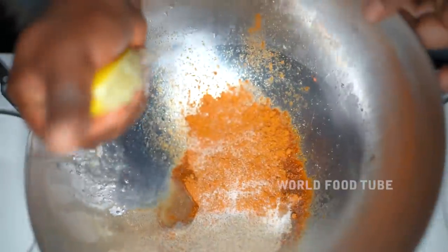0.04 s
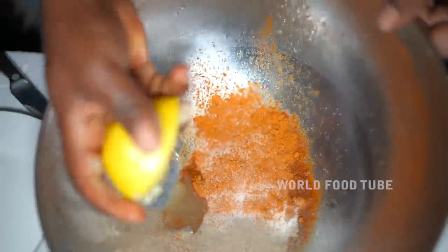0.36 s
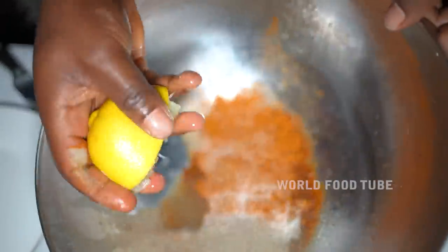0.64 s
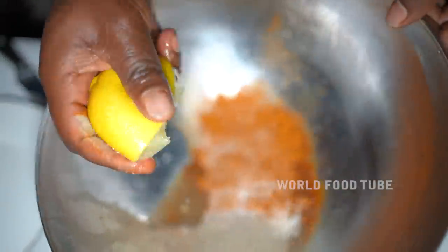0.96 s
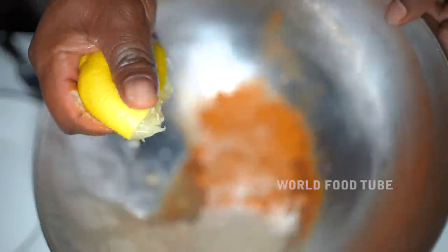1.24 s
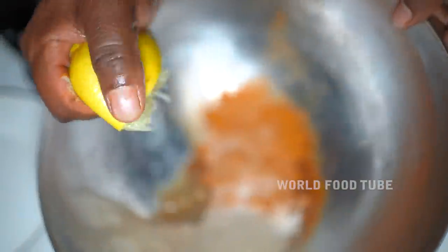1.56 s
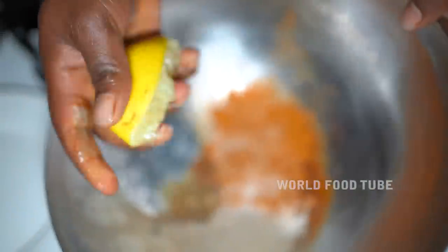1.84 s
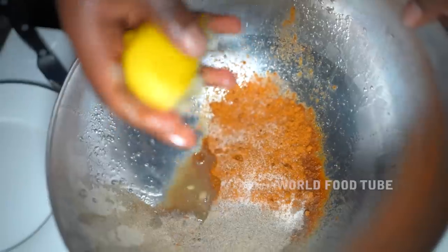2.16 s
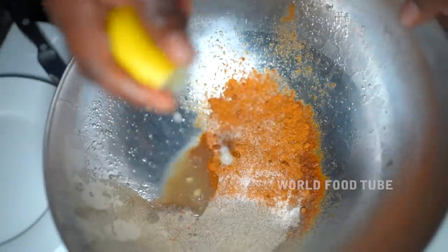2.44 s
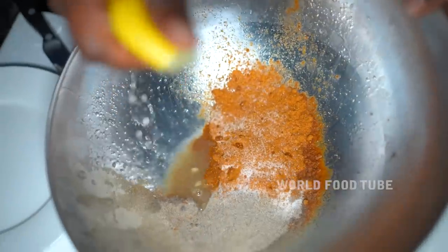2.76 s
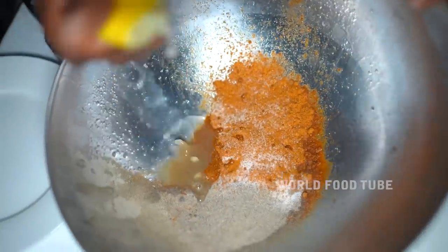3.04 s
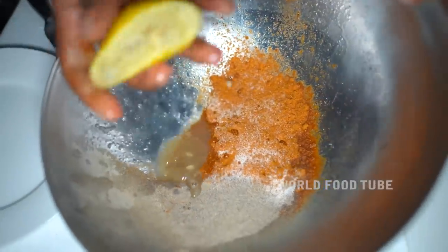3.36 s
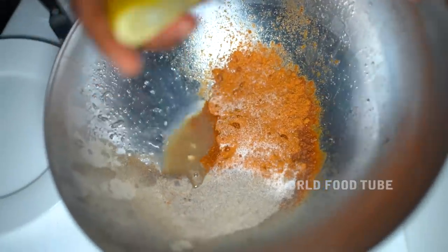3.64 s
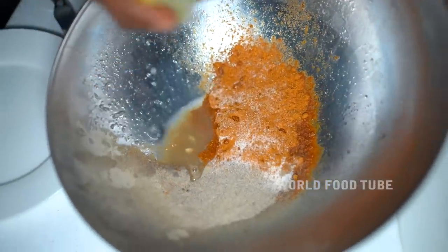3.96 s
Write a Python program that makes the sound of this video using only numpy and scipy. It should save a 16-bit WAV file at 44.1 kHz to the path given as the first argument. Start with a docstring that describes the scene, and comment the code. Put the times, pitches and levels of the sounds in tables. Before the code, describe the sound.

Half a lemon is squeezed by hand over a steel bowl, squelching and fizzing in spurts. Tiny pops and drips follow, and a few quick squelches finish the squeeze. Moving air rumbles on the close microphone throughout.

```python
"""Half a lemon is squeezed by hand over a steel bowl of spices, close to a microphone buffeted by air.
A thin jet hisses, then the pulp squelches as the grip changes and the first drops tap the bowl.
After a second, juice cells snap, small bubbles pop and, near 1.4 s, two drops plop into the puddle.
From 2.3 s the pulp fizzes harder under pressure, with more squelches, snaps and taps.
Three quick squelches close the squeeze near 3.8 s while the rumble of the air swells."""
import sys
import numpy as np
from scipy import signal
from scipy.fft import rfft, irfft, next_fast_len
from scipy.io import wavfile
from scipy.ndimage import uniform_filter1d, map_coordinates

SR = 44100
rng = np.random.default_rng(int(sys.argv[2]) if len(sys.argv) > 2 else 0)


def bounce(signal):
    """Save signal as a 16-bit WAV file at the path given by the first command-line argument."""
    frames = np.transpose(np.atleast_2d(signal))
    limited = np.clip(frames, -1, 1)
    pcm = np.round(limited * 32767).astype(np.int16)
    wavfile.write(sys.argv[1], SR, pcm)


N = 176400

# The bright tone of fine juice spray. Each row: frequency in Hz, relative gain in dB.
SPRAY = [(3000, -11), (6000, 0.5), (9000, 0.5), (16000, -4.5)]


def squelches():
    """Each fold of the wet pulp lets go a short, dense clump of bursting bubbles."""
    # Folds of the pulp. Each row: start in seconds, length in seconds, body level in dB, spray in dB.
    folds = [(0.365, 0.02, -40, -47.5), (0.387, 0.0092, -46, -64), (0.866, 0.023, -44.5, -61),
             (0.922, 0.03, -50.5, -54.5), (1.71, 0.016, -46.5, -58), (2.315, 0.021, -49.5, -76),
             (2.346, 0.019, -34.5, -65), (2.604, 0.025, -50, -57), (2.734, 0.016, -60, -48),
             (3.166, 0.021, -42.5, -46.5), (3.746, 0.021, -40.5, -65), (3.771, 0.02, -35, -43.5),
             (3.794, 0.046, -45.5, -73)]
    # The wet tone of a fold. Each row: frequency in Hz, relative gain in dB.
    squish_eq = [(500, -3), (1250, -6), (1800, 8), (2150, 3), (2700, 6), (3800, 12.5), (5000, 4.5),
                 (7000, 2.5), (11000, -30)]
    body, spray = np.zeros((2, N))
    for start, length, body_db, spray_db in folds:
        shape = swell(start, length, attack=0.0023, release=0.015)
        body += amp(body_db) * shape
        spray += amp(spray_db) * shape
    large = coloured(bubbles(count=5000, low_hz=1027, high_hz=7800, cycles=29, spread_db=-1.5), squish_eq)
    small = coloured(bubbles(count=6000, low_hz=8400, high_hz=18400, cycles=4.9, spread_db=5.5), SPRAY)
    return body * steadied(large, size=600) + spray * steadied(small, size=600)


def fizz():
    """Juice seeps through the pulp in fizzy spurts, with sticky crackle on top; thin jets add spray."""
    # The flow of seeping juice. Each row: time in seconds, relative level in dB.
    flow = [(0, -63), (.25, -64.5), (.38, -56), (.52, -66), (.68, -59), (.78, -54), (1.0, -58),
            (1.18, -54.5), (1.4, -59.5), (1.65, -66.5), (1.79, -53.5), (1.93, -70.5), (2.15, -63.5),
            (2.32, -52.5), (2.57, -57.5), (2.67, -51), (2.85, -54), (3.13, -66.5), (3.2, -49.5),
            (3.36, -72), (3.7, -58), (3.84, -55.5), (4, -62)]
    # Thin jets hissing out. Each row: start in seconds, length in seconds, level in dB.
    jets = [(0, 0.073, -63), (1.095, 0.15, -57.5), (2.706, 0.18, -54.5)]
    # The tones of the fizzing pulp and of its crackle. Each row: frequency in Hz, relative gain in dB.
    pulp_eq = [(350, -19.5), (700, -2.5), (950, -8.5), (1450, -7.5), (1780, 3), (2100, -8), (2650, 2.5),
               (3100, 1), (3850, 6), (4900, -6), (6200, -5.5), (13000, -26)]
    crackle_eq = [(900, -2.5), (3300, -4.5), (12000, -3.5)]
    flow_db, = curves(flow)
    body_gain = amp(flow_db - 1 + 4.4 * wobble(45))
    jet_gain = sum(amp(db) * swell(start, length, attack=0.013, release=0.67) for start, length, db in jets)
    spray_gain = np.hypot(jet_gain, amp(flow_db - 11))
    crackle_gain = amp(-61 + 0.62 * (flow_db - flow_db.mean()))  # rides the flow with gentler swings
    body = coloured(bubbles(count=9000, low_hz=590, high_hz=9240, cycles=11.5, spread_db=1), pulp_eq)
    spray = coloured(bubbles(count=12000, low_hz=4380, high_hz=17200, cycles=14, spread_db=3.5), SPRAY)
    crackle = coloured(bubbles(count=750, low_hz=1290, high_hz=15300, cycles=15, spread_db=5), crackle_eq)
    return body_gain * body + spray_gain * spray + crackle_gain * crackle


def wet_accents():
    """Bubbles pop, juice cells snap, air squeaks out in rising chirps and drops land with a dull tap."""
    # Bubbles popping at the cut face. Each row: start in seconds, gain in dB, pitch in Hz,
    # crack relative to the ring in dB.
    pops = [(0.128, -31, 5930, -9), (0.7993, -16, 6060, -41), (1.176, -24.5, 6600, -19),
            (1.313, -21, 5710, -6.5), (1.507, -26, 5860, 3), (1.818, -34.5, 5780, -4),
            (3.0196, -28, 6030, -6), (3.1035, -43.5, 5840, 14.5)]
    # Juice cells snapping. Each row: start in seconds, gain in dB, pitch in Hz.
    snaps = [(.312, -36.5, 3310), (0.3303, -28.5, 3680), (1.055, -37, 2610), (1.1084, -27, 3290),
             (1.153, -29, 2860), (1.1778, -25.5, 3060), (1.2402, -31, 7060), (1.334, -29.5, 4360),
             (1.682, -36, 9100), (1.701, -36, 10260), (2.2329, -37.5, 3000), (2.325, -31, 1740),
             (2.4635, -31, 3800), (2.553, -30, 4160), (2.864, -31.5, 3410), (3.7321, -31.5, 2900),
             (3.8098, -22, 5320)]
    # Air squeaking out of the pulp. Each row: start in seconds, gain in dB.
    chirps = [(.453, -34.5), (1.39, -30.5), (1.443, -37)]
    # Drops hitting the spices and the bowl. Each row: start in seconds, gain in dB.
    taps = [(0.284, -31), (.395, -27.5), (0.438, -32), (2.532, -35), (2.949, -33), (3.082, -33),
            (3.415, -31), (3.641, -29), (3.704, -34)]
    out = np.zeros(N)
    for start, db, hz, crack_db in pops:
        add(out, start, amp(db) * burst(hz, t60=0.025, attack=0.0007, rough=0.29, crack_db=crack_db))
    for start, db, hz in snaps:
        add(out, start, amp(db) * burst(hz, t60=0.015, attack=0.00045, rough=0.73, crack_db=-18))
    for start, db in chirps:
        add(out, start, amp(db) * burst(hz=2520, t60=0.015, attack=0.0007, rough=0.29, rise=220))
    for start, db in taps:
        add(out, start, amp(db) * burst(hz=1210, t60=0.0041, attack=0.00012, rough=0.25, crack_db=-47))
    return out


def plops():
    """A drop traps a bubble in the puddle, which rings briefly with an unsteady, rising pitch."""
    # Drops landing in the puddle. Each row: start in seconds, gain in dB.
    drops = [(1.3675, -29), (1.4145, -33)]
    out = np.zeros(N)
    for start, db in drops:
        add(out, start, amp(db) * burst(hz=673, t60=0.034, attack=0.001, rough=0.26, rise=7.4))
    return out


def bubbles(count, low_hz, high_hz, cycles, spread_db):
    """Tiny bubbles burst at random, each dying by 60 dB over `cycles` cycles; the bed has rms 1."""
    when, pitch, phase = rng.random((3, count, 1))
    size = amp(spread_db * np.clip(rng.standard_normal((count, 1)), -2, 2))
    hz = np.minimum(low_hz * (high_hz / low_hz) ** pitch, SR / 2)
    age = np.arange(SR // 128)
    turns = hz * age / SR
    envelope = amp(-60 * turns / cycles) * (1 - np.exp(-turns))
    rings = size * np.sqrt(hz) * np.sin(2 * np.pi * (turns + phase)) * envelope
    positions = (when * N).astype(int) + age
    return unit(np.bincount(positions.ravel(), rings.ravel(), N)[:N])


def burst(hz, t60, attack, rough, crack_db=-np.inf, rise=0):
    """A small wet burst: a wavering ring that climbs by rise * hz each second, with an optional crack."""
    t = np.arange(SR // 16) / SR
    drift, hiss = rng.standard_normal((2, len(t)))
    drift = uniform_filter1d(drift, int(SR / hz))
    waver = 2 * rough * np.cumsum(drift) * np.sqrt(hz / SR)
    ring = np.sin(2 * np.pi * hz * (t + rise * t * t / 2) + waver) * amp(-60 * t / t60)
    crack = hiss * amp(crack_db - 60 * t / 0.0097)
    return (ring + crack) * (1 - np.exp(-t / attack))


def bowl(x):
    """The steel walls throw the sound back within milliseconds and ring faintly; the room adds a tail."""
    # The bowl's resonances. Each row: frequency in Hz, relative level in dB.
    modes = [(698, -13.5), (1740, 0), (3946, -0.5), (6000, -18)]
    ring_t60_s, walls_t60_s, room_t60_s = 0.17, 0.033, 0.46
    t = np.arange(SR // 3) / SR
    ring = sum(np.sin(2 * np.pi * hz * t) * amp(db - 60 * t / ring_t60_s) for hz, db in modes)
    walls = rng.standard_normal(len(t)) * (t > .001) * amp(-60 * t / walls_t60_s)
    room = rng.standard_normal(len(t)) * (t > .006) * amp(-60 * t / room_t60_s)
    sends = [(ring, -25.5), (walls, -9.5), (room, -20.5)]
    response = sum(amp(db) * tail / np.linalg.norm(tail) for tail, db in sends)
    return x + signal.fftconvolve(x, response)[:N]


def draught():
    """Moving air buffets the microphone: a lumpy rumble, faster eddies and a few single puffs."""
    # The rise and fall of the rumble and of the eddies. Each row: time in seconds, relative level in dB.
    rumble_levels = [(0, -22.5), (.45, -20), (.65, -24.5), (1.0, -27), (1.22, -33), (1.42, -23),
                     (1.65, -26.5), (1.8, -20.5), (2.05, -29), (2.2, -22.5), (2.47, -32.5), (2.8, -21.5),
                     (3.1, -26), (3.45, -19), (3.67, -24), (3.77, -19.5), (4, -17)]
    eddy_levels = [(0, -33), (.45, -32), (1.2, -41.5), (2.15, -37), (2.5, -44), (2.8, -33), (3.2, -40),
                   (3.42, -30), (3.66, -40.5), (3.8, -36)]
    # The tones of the rumble and of the eddies. Each row: frequency in Hz, relative gain in dB.
    rumble_eq = [(8, -13), (22, -0.5), (38, 0.5), (80, -9.5), (120, -20), (900, -118)]
    eddy_eq = [(60, -15), (120, 5.5), (220, -6.5), (320, -17.5), (450, -25.5), (3500, -80)]
    # Puffs thumping the microphone. Each row: centre in seconds, peak in dB.
    puffs = [(0.222, -4), (0.473, -12.5), (1.033, -8), (2.158, -10), (2.763, -11.5), (3.191, -15),
             (3.294, -6.5)]
    puff_hz, puff_width_s = 43.4, 0.016
    t = np.arange(N) / SR
    thumps = np.zeros(N)
    for centre, db in puffs:
        shape = np.exp(-((t - centre) / puff_width_s) ** 2)
        thumps += amp(db) * shape * np.cos(2 * np.pi * puff_hz * (t - centre))
    rumble_db, = curves(rumble_levels)
    eddy_db, = curves(eddy_levels)
    rumble = amp(rumble_db + 3) * steadied(noise(rumble_eq), size=4400)
    eddies = amp(eddy_db + 0.5 + 2.8 * wobble(25.2)) * noise(eddy_eq)
    return thumps + rumble + eddies


def room_tone():
    """A faint, steady bed of noise lies under everything."""
    # The tone of the quiet room. Each row: frequency in Hz, relative gain in dB.
    room_eq = [(500, 3), (1000, -5), (1800, -6), (5000, -45), (6000, -8.5), (7500, -29), (16000, -15)]
    return amp(-62) * noise(room_eq)


def amp(db):
    return 10 ** (np.asarray(db) / 20)


def unit(x):
    return x / np.sqrt(np.mean(x ** 2) + 1e-20)


def add(track, start, sound):
    i = int(round(start * SR))
    track[i:i + len(sound)] += sound[:N - i]


def swell(start, length, attack, release):
    """An envelope that ramps up, holds until `length`, then falls 60 dB per `release`; all in seconds."""
    t = np.arange(N) / SR - start
    return np.clip(t / attack, 0, 1) * amp(-60 * np.maximum(t - length, 0) / release)


def curves(rows):
    """One value per sample for each column after the time."""
    times, *columns = np.transpose(rows)
    return [np.interp(np.arange(N) / SR, times, column) for column in columns]


def wobble(rate):
    """A smooth random curve with `rate` knots a second."""
    return map_coordinates(rng.standard_normal(4096), [np.arange(N) * rate / SR], mode="wrap")


def filtered(x, response):
    """x through a gain that depends on frequency."""
    size = next_fast_len(N + SR // 2)
    return irfft(rfft(x, size) * response(np.fft.rfftfreq(size, 1 / SR)), size)[:N]


def coloured(x, eq):
    """x through an EQ curve of (Hz, dB) points, at rms 1."""
    points_hz, db = np.transpose(eq)
    return unit(filtered(x, lambda hz: amp(np.interp(np.log(hz + 1), np.log(points_hz), db))))


def noise(eq):
    return coloured(rng.standard_normal(N), eq)


def steadied(x, size):
    """x with swells slower than about `size` samples evened out."""
    power = uniform_filter1d(uniform_filter1d(x * x, size), size)
    return x / np.sqrt(np.abs(power) + 1e-6)


def scene():
    """The lemon sounds in the bowl, the plops stay dry, and air and room tone lie underneath."""
    lemon = bowl(fizz() + squelches() + wet_accents()) + plops()
    return (lemon + draught() + room_tone())[None]


def record(dry):
    """A steep high cut takes off the very top of the treble."""
    top_hz = 15950
    return filtered(dry[0], lambda hz: hz < top_hz)[None]


dry = scene()
out = record(dry)
bounce(out)
```